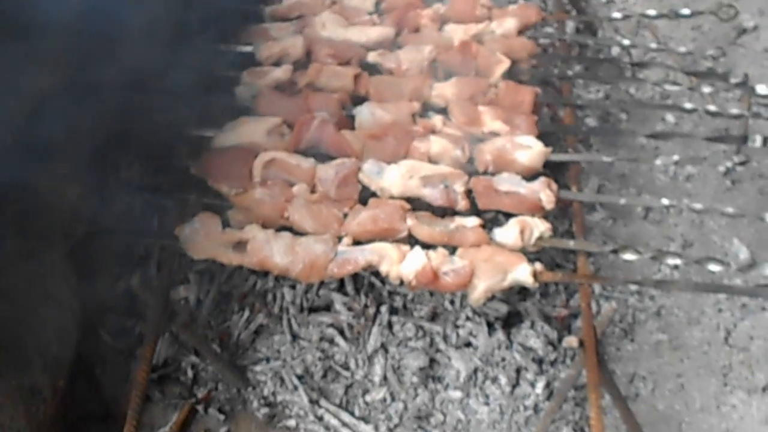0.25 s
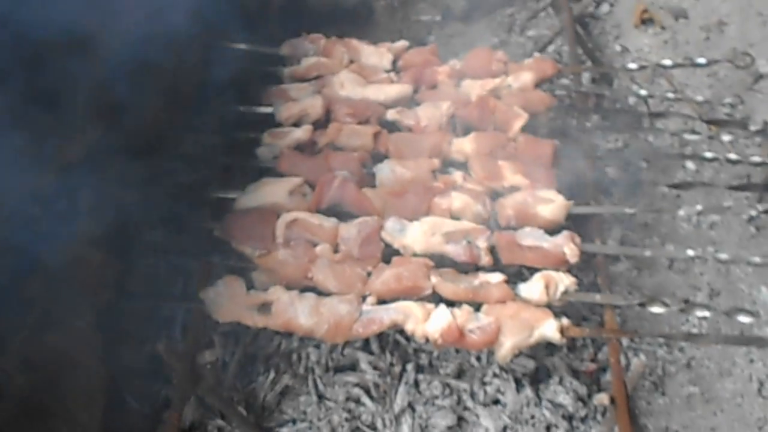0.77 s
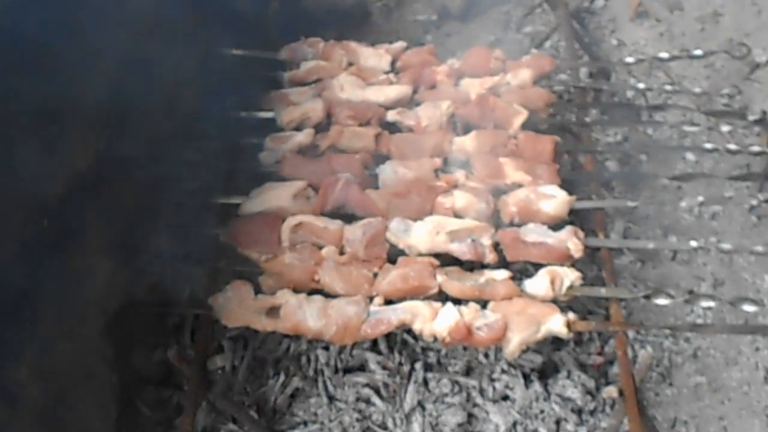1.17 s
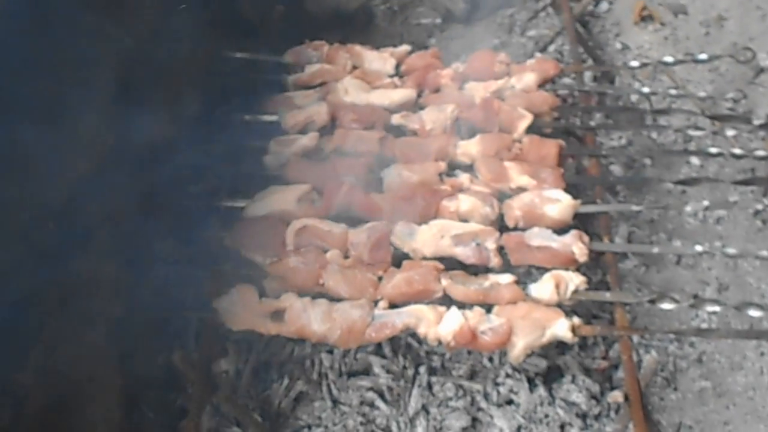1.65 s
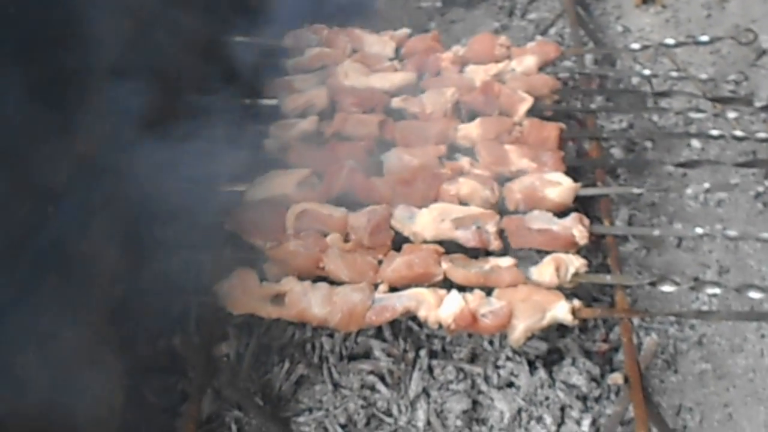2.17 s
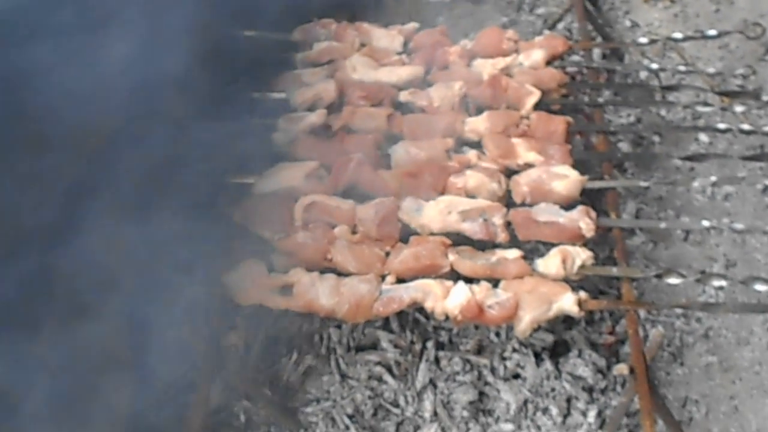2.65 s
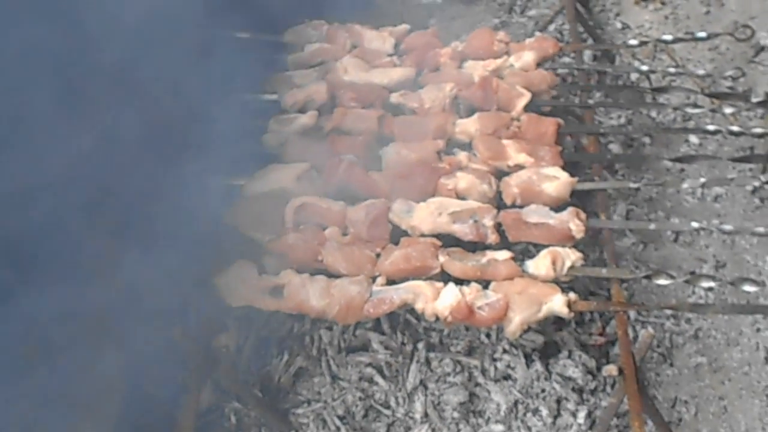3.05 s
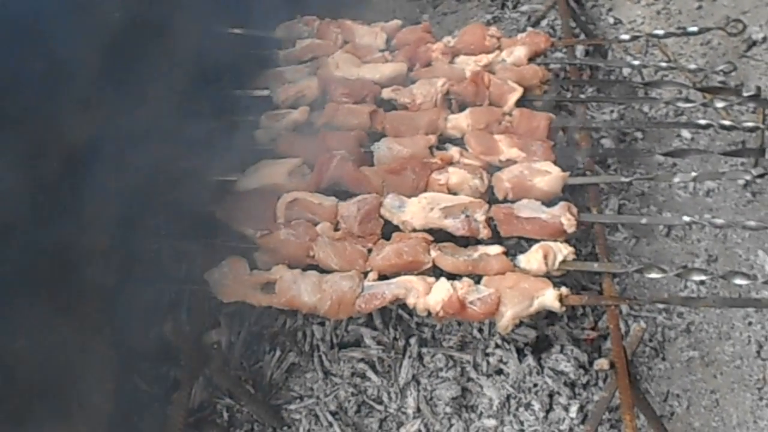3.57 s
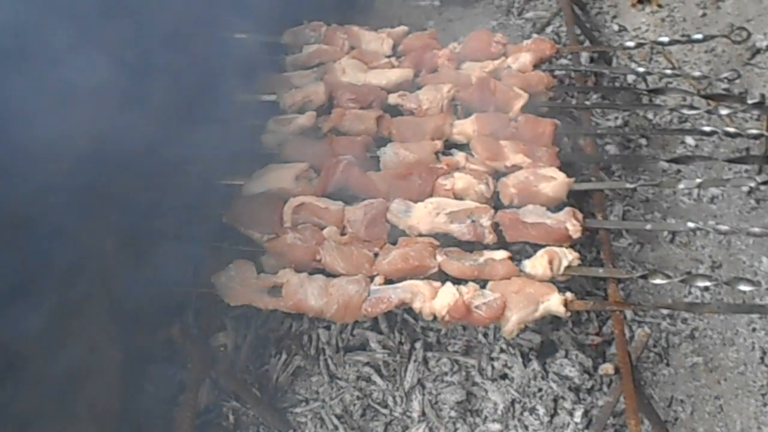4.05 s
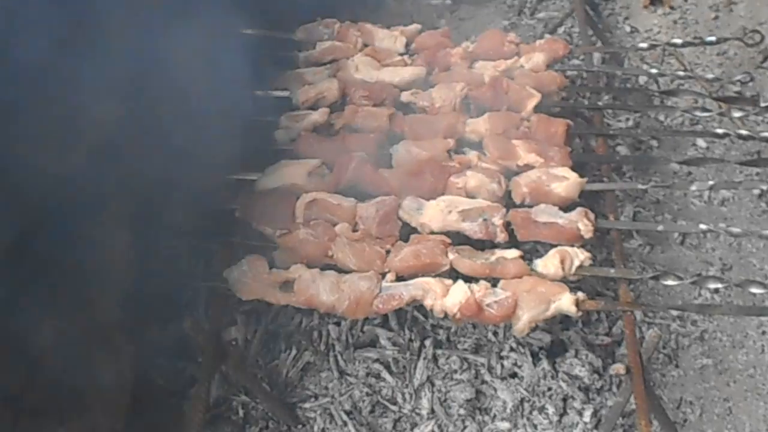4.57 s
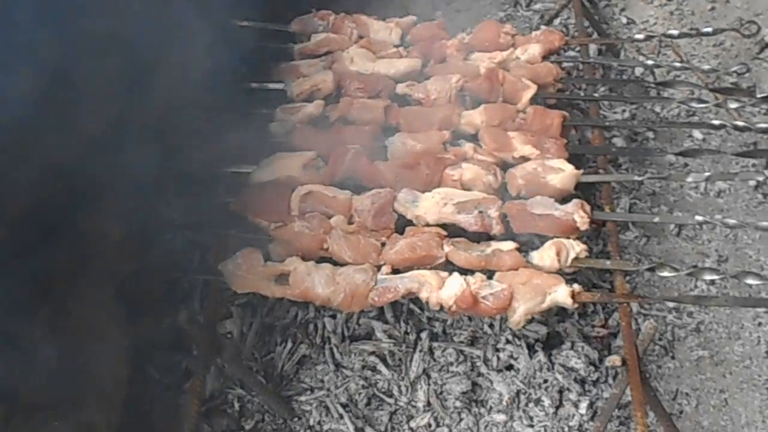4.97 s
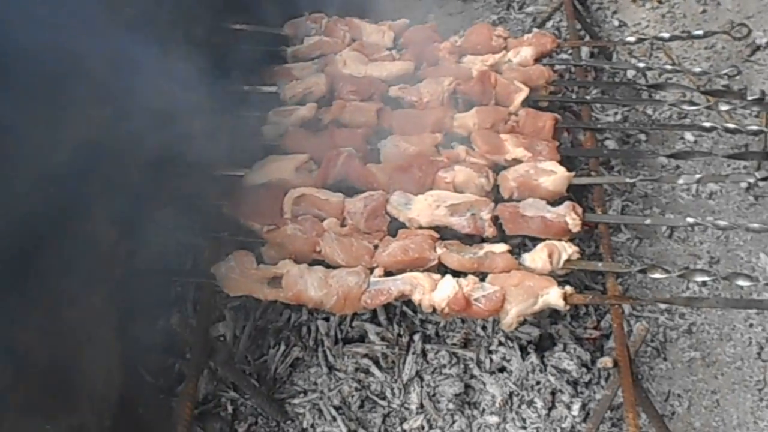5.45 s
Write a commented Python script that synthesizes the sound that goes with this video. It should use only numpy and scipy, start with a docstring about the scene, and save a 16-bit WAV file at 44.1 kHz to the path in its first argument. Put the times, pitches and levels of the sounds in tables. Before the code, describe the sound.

Skewered meat fries and hisses close up above glowing embers while coals pop sharply, drips splat in ash, and a coal bursts loudly.

```python
"""Outdoors, skewers of meat over wood embers, one microphone close above; the juice sizzles throughout.
From the first moments embers snap (filtered pulses), drips splat and puff in the ash, and fat flares
into bright frying (grainy noise) among gushes of steam (hissing noise); spits of fat join at 0.6 s.
At 0.73 s a coal bursts with a loud crack (a torn noise burst and ringing modes); steam jets, drips and
snaps carry on (gliding noise, more pulses), and near 5 s a gas pocket squeaks (a falling tone)."""
import sys
import numpy as np
from scipy import signal
from scipy.fft import irfft
from scipy.io import wavfile
from scipy.ndimage import uniform_filter1d

SR = 44100
rng = np.random.default_rng(int(sys.argv[2]) if len(sys.argv) > 2 else 0)


def materialize(psi):
    """Save the field psi as 16-bit PCM at rate SR to the path in sys.argv[1].

    A 1-D psi becomes a single channel; in a 2-D psi each row is a channel.
    """
    bounded = np.clip(np.atleast_2d(psi).T, -1, 1)
    quanta = np.round(bounded * 32767).astype(np.int16)
    wavfile.write(sys.argv[1], SR, quanta)


N = 251811
TIME = np.arange(N) / SR


def amp(db):
    """Decibels to gain."""
    return np.exp(np.asarray(db) * (np.log(10) / 20))


def unit(x):
    """Scales to rms 1."""
    return x / np.sqrt(np.mean(x ** 2) + 1e-20)


def add(mix, s, sound):
    """Mixes a sound in, starting at second s."""
    part = mix[max(round(s * SR), 0):][:len(sound)]
    part += sound[:len(part)]


def read(points, hz):
    """Reads rows (frequency [Hz], value) on a log-frequency axis."""
    f, value = np.transpose(points)
    return np.interp(np.log(hz + 1), np.log(f + 1), value)


def hump(centre_hz, octaves):
    """Spectrum (frequency [Hz], level [dB]) of one rounded resonance."""
    hz = np.geomspace(20, SR / 2, 200)
    distance = np.log2(hz / centre_hz) / octaves
    return np.c_[hz, -40 * np.log10(1 + distance ** 2 / 2)]


def colour(x, points, size=4096):
    """Causal minimum-phase filter with the given spectrum, so that attacks stay sharp."""
    hz = abs(np.fft.fftfreq(size, 1 / SR))
    log_gain = np.log(amp(read(points, hz)))
    response = np.exp(np.conj(signal.hilbert(log_gain)))[:size // 2 + 1]
    impulse = irfft(response, size)[:size // 2]
    return signal.oaconvolve(x, impulse)[:len(x)]


def wander(per_s, size=16):
    """Smooth random curve of rms 1; a higher per_s makes it change faster."""
    steps, span = TIME[::size], max(int(SR / per_s / size), 1)
    once = uniform_filter1d(rng.standard_normal(len(steps)), span)
    smooth = uniform_filter1d(once, span)
    return np.interp(TIME, steps, unit(smooth))


def bubbles(per_s, spread_db, count=N):
    """Sparse clicks of either sign, as bubbles burst: most are small, a few large."""
    size_db = spread_db * np.minimum(rng.exponential(1, count), 5)
    sign = rng.choice([-1, 1], count)
    bursts = rng.random(count) < per_s / SR
    return unit(amp(size_db) * sign * bursts)


def scatter(t60, count=8192):
    """Dense reflections from coals, meat and ground, of energy 1: noise that dies away."""
    t = np.arange(count) / SR
    return unit(rng.standard_normal(count) * amp(-60 * t / t60)) / np.sqrt(count)


def rush(hz, width_hz):
    """Noise through a three-pole resonance that follows the pitch curve hz."""
    r = np.exp(-np.pi * width_hz / SR)
    noise = rng.random((2, len(hz))) - .5
    a, b = signal.lfilter([1], np.poly([r, r, r]), noise)
    phase = (2 * np.pi * (np.cumsum(hz / SR) % 1)).astype(np.float32)
    return unit(a * np.cos(phase) + b * np.sin(phase))


def drifting(resonances, drift, swing_db, per_s):
    """Resonances that each waver in pitch and strength on their own."""
    return sum(amp(db + swing_db * wander(per_s)) * rush(hz * (1 + drift * wander(5)), width)
               for hz, width, db in resonances)


def envelope(t, rise, hold, fall_db_per_s):
    """Gain that rises from t = 0, stays up until t = hold, then falls steadily in dB."""
    return np.clip(t / rise, 0, 1) * amp(-abs(fall_db_per_s) * np.maximum(t - hold, 0))


def surges(rows, rise, rest_db):
    """Gain of a steady source with surges (start [s], level [dB], hold [s], fall [dB/s]); powers add."""
    power = sum((amp(db) * envelope(TIME - s, rise, hold, fall)) ** 2 for s, db, hold, fall in rows)
    return np.sqrt(amp(rest_db) ** 2 + power)


def pop(hz, octaves, rattle_db, rattle_t60, tail_db, tail_t60):
    """One pressure step, a brief rattle of its own coal and a scattered tail; rms 1 in the first 2 ms."""
    pulse = amp(rattle_db) * scatter(rattle_t60) + amp(tail_db) * scatter(tail_t60)
    pulse[0] += 1
    sound = colour(pulse, hump(hz, max(octaves, .2)))
    return sound / np.std(sound[:SR // 500])


# spectra of the hiss and of the draught: (frequency [Hz], level [dB])
STEAM_COLOUR = [(200, -29.5), (450, -7), (800, 0.5), (1500, 1.5), (2500, -0.5), (4000, -2), (5500, -6),
                (10000, -38)]
DRAUGHT_COLOUR = [(20, -25), (55, -19.5), (110, -11), (260, 4.5), (420, 0.5), (800, 4), (2000, -35)]
# resonances that colour the steam: (frequency [Hz], pole width [Hz], mean level [dB])
STEAM_RESONANCES = [(795, 540, -11), (1427, 500, -12), (2078, 560, -7.5), (2976, 580, -8), (3900, 1700, -7)]
# gushes from wet embers, which pull a draught:
# (start [s], hiss level [dB], draught level [dB], hold [s], fall [dB/s])
GUSHES = [(-0.03, -48, -70, 0.041, 83), (0.128, -47.5, -68.5, 0.26, 29.5), (0.584, -52, -66.5, 0.55, 40),
          (0.972, -50, -65, 0.27, 168), (1.463, -47.5, -68, 0.73, 40), (2.253, -46.5, -63, 0.059, 17),
          (2.606, -53.5, -73, 0.32, 14), (3.093, -45, -72.5, 0.12, 51), (3.795, -52, -61, .2, 34.5),
          (4.848, -51.5, -81, 0.042, 68.5), (5.507, -55, -80, 0.2, 18)]
GUSH_RISE_S = 0.034
STEAM_REST_DB, DRAUGHT_REST_DB = -58, -73.5  # between the gushes


def steam():
    """Wet embers hiss through resonances that waver in pitch and strength, over a low, fluttering draught."""
    hiss = unit(colour(rng.standard_normal(N) + amp(-3.5) * bubbles(500, 2.4), STEAM_COLOUR))
    hiss = unit(hiss + drifting(STEAM_RESONANCES, drift=.025, swing_db=2.4, per_s=15))
    hiss_flutter = amp(1.7 * wander(50))
    draught = unit(colour(rng.standard_normal(N), DRAUGHT_COLOUR)) * amp(2 * wander(23))
    start, hiss_db, draught_db, hold, fall = np.transpose(GUSHES)
    steaming = surges(zip(start, hiss_db, hold, fall), GUSH_RISE_S, STEAM_REST_DB)
    drawing = surges(zip(start, draught_db, hold, fall), GUSH_RISE_S, DRAUGHT_REST_DB)
    return steaming * hiss * hiss_flutter + drawing * draught


# spectra of simmering juice and of frying fat: (frequency [Hz], level [dB])
SIMMER_COLOUR = [(180, -40), (300, -0.5), (538, -8.5), (832, -32.5), (966, -4.5), (1320, -0.5), (1470, -8),
                 (1660, 7), (1950, -3.5), (2520, -3), (2840, -5), (4200, 8.5), (5340, -2), (9160, -1),
                 (10800, -56), (14000, -49), (22000, -120)]
FRY_COLOUR = [(1000, -20), (2200, -4), (3800, -1), (5000, 5), (6100, 2.5), (6700, 1), (7700, 1), (8700, -3),
              (9600, -5.5), (10500, -11.5)]
# ringing of the frying bubbles: (frequency [Hz], pole width [Hz], mean level [dB])
FRY_RINGS = [(4750, 510, -13.5), (6020, 700, -11.5), (7740, 950, -10), (9080, 1260, -14)]
# fat hits a hot spot, fries up and dies down, level before the frying flutter:
# (start [s], level [dB], hold [s], fall [dB/s])
FLARES = [(0.18, -49.5, 0.072, 34), (0.445, -41.5, 0.0577, 350), (0.84, -48.5, 0.054, 153.5),
          (2.265, -41, 0.077, 17.5), (3.12, -55, 0.096, 108), (3.86, -53.5, 0.093, 30),
          (4.2, -43.5, 0.046, 49), (4.49, -47.5, 0.21, 21), (5.53, -53.5, .07, 17)]
FLARE_RISE_S, FRY_REST_DB = 0.044, -56.5  # rest: frying between the flares, before the flutter


def sizzle():
    """Juice simmers steadily among tiny ticks; whatever fries beyond that is brighter and grainier."""
    ticking = amp(-5) * bubbles(1500, 4) + amp(-11) * bubbles(120, 4.2)
    simmer = unit(colour(rng.standard_normal(N) + ticking, SIMMER_COLOUR))
    fry = unit(colour(rng.standard_normal(N) + amp(4) * bubbles(2200, 3.3), FRY_COLOUR))
    fry = unit(fry + drifting(FRY_RINGS, drift=0.026, swing_db=3, per_s=8.4))
    frying = surges(FLARES, FLARE_RISE_S, FRY_REST_DB)
    fry_flutter = amp(0.5 + 0.55 * wander(60))
    return amp(-56.0) * simmer * amp(.5 * wander(29)) + frying * fry * fry_flutter


# jets of steam, level before sputter and high-pass:
# (peak time [s], half length [s], pitch at peak [Hz], glide [octaves/s], pole width [Hz], level [dB])
JETS = [(0.459, 0.063, 3383, 0.025, 4460, -44.5), (1.1, .16, 830, -0.13, 160, -55),
        (1.177, 0.1016, 1345, -1.2, 220, -51), (1.85, .2, 3846, 0, 493, -56.5),
        (1.994, .14, 744, 0.94, 160, -55.5), (3.212, .11, 2868, -.7, 1410, -41.5),
        (3.2, 0.103, 4650, -0.038, 2800, -51.5), (3.479, .17, 272.4, 0, 92, -64),
        (3.911, .095, 1604, .8, 1100, -46.5), (4.119, 0.084, 1500, -1.5, 400, -57.5),
        (4.905, .045, 830, -.6, 120, -55), (5.591, 0.047, 3030, 0, 1100, -47.5)]


def jets():
    """Now and then steam breaks out of one crack in a short, sputtering, gliding rush."""
    out, sputter = np.zeros(N), amp(0.5 * wander(250))
    for s, half, hz, glide, width_hz, db in JETS:
        t = np.arange(-1.5 * half, 1.5 * half, 1 / SR)
        swell = np.exp(-abs(t / half) ** 3 * 2)
        add(out, s + t[0], amp(db) * swell * rush(hz * 2 ** (glide * t), width_hz))
    highpass = signal.butter(2, 220, "highpass", fs=SR, output="sos")
    return sputter * signal.sosfilt(highpass, out)


# drips landing in the ash, and at 4.642 s the knock of an ember snap; puff level before its rise and decay: #
# (time [s], splat level [dB], splat centre [Hz], splat width [octaves], puff level [dB])
DRIPS = [(0.209, -40.5, 1300, 0.44, -66), (0.233, -42, 1150, 0.52, -65.5), (0.334, -26, 1080, 1.11, -53),
         (0.634, -42, 735, 0.79, -60.5), (0.979, -42, 945, 0.75, -49), (1.028, -36, 1470, 1.66, -52),
         (1.476, -42, 930, 1.2, -43.5), (2.223, -33, 896, 0.44, -53), (2.274, -35.5, 850, 1.17, -47.5),
         (2.708, -62, 600, 1, -52.5), (3.086, -36.5, 1650, 0.95, -59), (3.781, -42.5, 420, 0.91, -67),
         (3.816, -39.5, 434, 1.1, -53), (4.547, -45.5, 634, 1.3, -67), (4.642, -34.5, 1800, 0.24, -67),
         (4.876, -45, 830, 0.45, -70), (5.408, -45, 1500, .5, -72.5), (5.431, -53.5, 400, 1.8, -59)]
DRIP_RATTLE_DB, DRIP_RATTLE_T60 = -5.5, .03  # dB against the first step, s
DRIP_TAIL_DB, DRIP_TAIL_T60 = 3, 0.11
PUFF_HZ, PUFF_RISE_S, PUFF_T60 = 230, 0.011, .15


def drips():
    """A drip splats in the ash, turns to vapour at once and pushes the air; the row at 4.642 s is the knock of
    an ember snap."""
    out, t = np.zeros(N), np.arange(SR // 4) / SR
    push = (1 - np.exp(-t / PUFF_RISE_S)) * amp(-60 * t / PUFF_T60)
    for s, splat_db, hz, octaves, puff_db in DRIPS:
        splat = pop(hz, octaves, DRIP_RATTLE_DB, DRIP_RATTLE_T60, DRIP_TAIL_DB, DRIP_TAIL_T60)
        add(out, s, amp(splat_db) * splat)
        vapour = unit(colour(rng.standard_normal(len(t)), hump(PUFF_HZ, 1.0)))
        add(out, s, amp(puff_db) * push * vapour)
    return out


# spits of fat, level before the boil dies away: (time [s], level [dB], centre [Hz], full-boil length [s])
SPITS = [(0.6054, -36.5, 3300, 0.0025), (2.1689, -31, 3930, .016), (3.593, -39, 4300, 0.02)]


def spits():
    """A drop of fat boils away in one quick volley of bursting bubbles."""
    out, t = np.zeros(N), np.arange(SR // 8) / SR
    for s, db, hz, length in SPITS:
        boil = amp(-60 * np.maximum(t - length, 0) / 0.083)
        volley = colour(bubbles(3500, 0.99, count=len(t)), hump(hz, 1.03))
        add(out, s, amp(db) * boil * unit(volley))
    return out


# the loudest ember snaps, tail against the first step:
# (time [s], level [dB], centre [Hz], width [octaves], scattered tail level [dB])
SNAPS = [(0.0565, -33, 4480, 0.57, 2.5), (0.2, -31, 4840, 0.61, -0.5), (0.3316, -38, 2010, 0.74, 15),
         (0.8544, -30, 4500, 2.6, 3), (1.3298, -21.5, 3400, 2.36, 6), (1.4075, -41, 3900, 1.05, 6),
         (1.607, -32, 4930, 0.865, -7), (2.0691, -27, 3900, 1.16, 5), (2.2656, -33, 1910, 0.92, 12.5),
         (2.4601, -28, 4900, 1.1, 5), (2.6656, -32, 4400, 0.72, -2), (2.841, -31, 5220, 1.4, -3.5),
         (3.2676, -37.5, 4400, 0.43, 1.5), (3.5986, -33, 4500, 0.38, 9), (3.6158, -30, 4470, 0.47, -3),
         (3.8674, -29.5, 5530, 1.4, 3), (3.887, -29, 4800, 1.9, 2.5), (3.944, -36.5, 2250, 2.7, 8.5),
         (4.0168, -35.5, 2920, 1.7, 8), (4.4019, -34, 4200, .35, -14), (4.4264, -35.5, 5400, 0.68, -11.5),
         (4.6411, -28, 2550, 1.46, 1), (4.654, -33, 2390, 1.49, 6), (4.9628, -24.5, 4200, .25, -2),
         (5.2034, -40.5, 4070, 1.04, -12), (5.2429, -40.5, 5000, 1.34, 7), (5.421, -40, 4120, 0.56, 8.5),
         (5.4457, -38, 4200, 0.96, 8.5), (5.6075, -32, 3105, 0.6, 9.5)]
SNAP_RATTLE_DB, SNAP_RATTLE_T60, SNAP_TAIL_T60 = 3, 0.0066, 0.1  # dB against the first step, s, s
TICK_COUNT = 24  # faint snaps at random moments
TICK_DB, TICK_SPREAD_DB = -43, 0.5
TICK_HZ, TICK_SPREAD_OCTAVES = 4000, .25


def snaps():
    """The embers snap: a few loud ones among faint ticks at random moments."""
    out = np.zeros(N)
    for s, db, hz, octaves, tail_db in SNAPS:
        snap = pop(hz, octaves, SNAP_RATTLE_DB, SNAP_RATTLE_T60, tail_db, SNAP_TAIL_T60)
        add(out, s, amp(db) * snap)
    for _ in range(TICK_COUNT):
        s, size, pitch = rng.uniform(0, N / SR), rng.standard_normal(), rng.standard_normal()
        tick = pop(TICK_HZ * 2 ** (TICK_SPREAD_OCTAVES * pitch), octaves=.95, rattle_db=SNAP_RATTLE_DB,
                   rattle_t60=SNAP_RATTLE_T60, tail_db=-1.0, tail_t60=SNAP_TAIL_T60)
        add(out, s, amp(TICK_DB + TICK_SPREAD_DB * size) * tick)
    return out


SQUEAK_S = 4.9628
SQUEAK_START_HZ, SQUEAK_END_HZ, SQUEAK_SAG_S = 4600, 3320, 0.0051  # sag: time constant
SQUEAK_DB = -24.5  # peak of the fundamental, before the envelope
SQUEAK_RISE_S, SQUEAK_HOLD_S, SQUEAK_FALL_DB_PER_S = 0.0084, 0.013, 1100  # hold counts from the start


def squeak():
    """Gas whistles hoarsely out of a pore, falling in pitch as the pressure drops."""
    t = np.arange(SR // 10) / SR
    pitch = SQUEAK_END_HZ + (SQUEAK_START_HZ - SQUEAK_END_HZ) * np.exp(-t / SQUEAK_SAG_S)
    hoarse_pitch = pitch * (1 + .025 * wander(900)[:len(t)])
    phase = 2 * np.pi * np.cumsum(hoarse_pitch) / SR
    tone = np.sin(phase) + amp(-10.5) * np.sin(2 * phase) + amp(-30) * np.sin(3 * phase)
    air = unit(colour(rng.standard_normal(len(t)), hump(5300, 1.0)))
    flow = amp(SQUEAK_DB) * envelope(t, SQUEAK_RISE_S, SQUEAK_HOLD_S, SQUEAK_FALL_DB_PER_S)
    out = np.zeros(N)
    add(out, SQUEAK_S, flow * (tone + amp(-12.5) * air))
    reflections = signal.oaconvolve(out, scatter(.07))[:N]
    return out + amp(-15) * reflections


# spectrum of the tearing coal: (frequency [Hz], level [dB])
CRACK_COLOUR = [(30, -32.5), (150, -32), (330, -24.5), (500, -10), (640, -2), (780, 1), (1100, -5),
                (2000, -1), (3000, -5), (3900, -13.5), (5000, -16), (7500, -22), (9500, -32), (10800, -39)]
# how fast the tear dies away: (frequency [Hz], t60 [s])
CRACK_DECAY = [(60, .07), (250, 0.27), (700, 0.12), (2500, 0.1), (5000, 0.11), (10000, 0.11)]
# ringing of the coal and the grill around it: (frequency [Hz], level within the ring [dB], t60 [s])
CRACK_MODES = [(670, -16.5, 0.15), (742, 3.5, 0.054), (822, -1.5, 0.092), (941, 4.5, 0.096),
               (1253, -3, 0.14), (1455, 7, 0.098), (1543, -19.5, .12), (1934.6, 1, 0.1),
               (2070, -32.5, 0.36), (2328, 1.5, 0.13), (2607, 0, 0.13), (2765, -12, .1), (3016, -6, 0.075)]
CRACK_S = 0.7329


def crack():
    """A coal starts to split, tears apart for about a hundredth of a second, and the grill rings."""
    t = np.arange(SR // 2) / SR
    hz, when, z = signal.stft(rng.standard_normal(len(t)), SR, nperseg=256)
    fade = amp(-60 * np.maximum(when - .007, 0) / read(CRACK_DECAY, hz)[:, None])
    yard = amp(-25.0 - 60 * when / .5)  # faint return from the surroundings
    tear = signal.istft(z * np.hypot(fade, yard), SR, nperseg=256)[1][:len(t)]
    tear = colour(tear, CRACK_COLOUR)
    tear /= np.std(tear[:SR // 80])
    ring = sum(amp(db - 60 * t / t60) * np.sin(2 * np.pi * (f * t + rng.random()))
               for f, db, t60 in CRACK_MODES)
    ring_onset = 1 - np.exp(-t / .001)
    out = np.zeros(N)
    add(out, CRACK_S - .0026, amp(-22) * tear[:SR // 380])  # the first split, weaker
    add(out, CRACK_S, amp(-8.0) * tear + amp(-19.0) * ring * ring_onset)
    return out


def scene():
    """Everything comes from the one bed of embers, summed to one channel."""
    bed = steam() + sizzle()
    events = jets() + drips() + spits() + snaps() + squeak() + crack()
    return (bed + events)[None]


EDGE_HZ = 10450  # upper band limit


def record(dry):
    """At the crack the peaks clip; then a low-pass sets the band limit."""
    clipped = np.clip(dry, -.92, .92)
    lowpass = signal.firwin(141, EDGE_HZ, window=("kaiser", 8), fs=SR)
    return signal.oaconvolve(clipped, lowpass[None], "same")


dry = scene()
out = record(dry)
materialize(out)
```